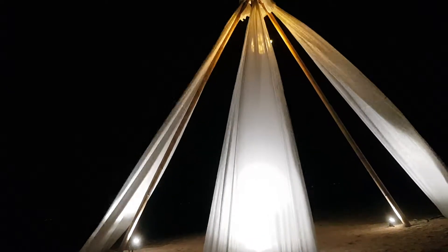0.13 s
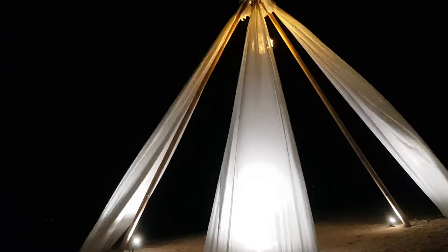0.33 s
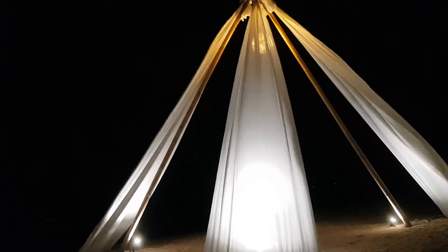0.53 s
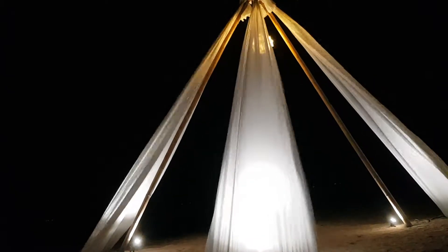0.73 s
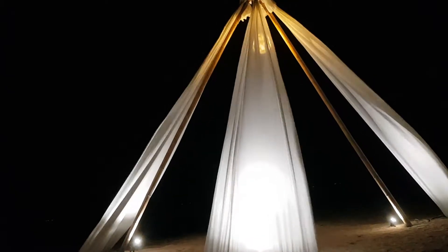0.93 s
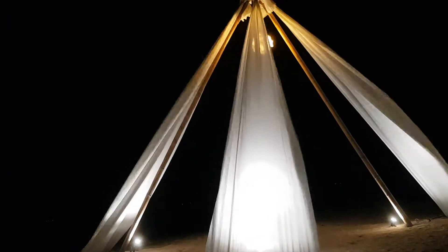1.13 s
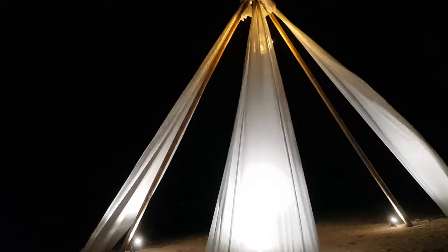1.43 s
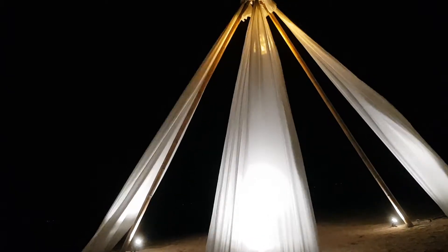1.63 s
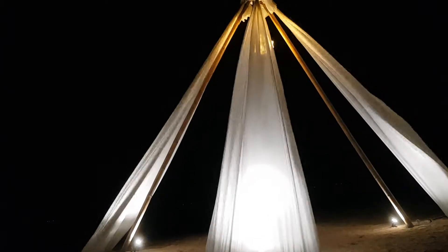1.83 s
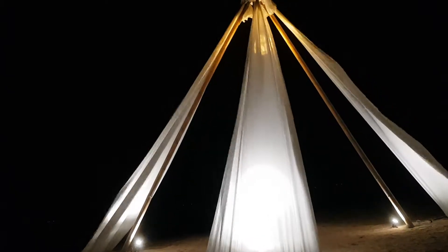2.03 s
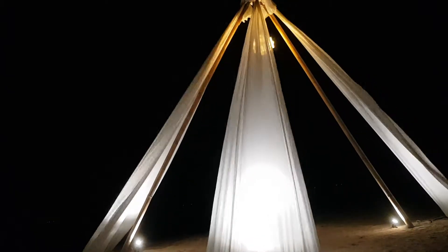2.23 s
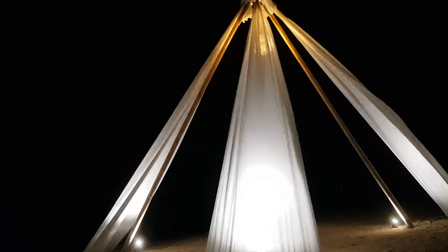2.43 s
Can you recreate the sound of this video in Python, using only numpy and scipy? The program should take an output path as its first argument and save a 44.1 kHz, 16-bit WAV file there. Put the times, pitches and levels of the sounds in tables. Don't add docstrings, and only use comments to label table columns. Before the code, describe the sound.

Low wind rumble thumps unevenly over a soft hiss of receding wave water and high insect chirring

```python
import sys
import numpy as np
from scipy import signal
from scipy.fft import rfft, irfft, next_fast_len
from scipy.io import wavfile
from scipy.ndimage import uniform_filter1d, map_coordinates

SR = 44100
rng = np.random.default_rng(int(sys.argv[2]) if len(sys.argv) > 2 else 0)


def volts(x):
    e = np.asarray(x, float) / 20
    return 10 ** e


def unload_audio(sound):
    columns = np.transpose(np.atleast_2d(sound))
    steps = np.round(np.clip(columns, -1, 1) * 32767)
    wavfile.write(sys.argv[1], SR, steps.astype(np.int16))


N = 113337


def unit(x):
    return x / np.sqrt(np.mean(x ** 2) + 1e-20)


def along(points, hz):
    f, value = np.transpose(points)
    return np.interp(np.log(hz + 1), np.log(f + 1), value)


def curve(rows):
    s, value = np.transpose(rows)
    return np.interp(np.arange(N) / SR, s, value)


def wobble(knots_per_s):
    return map_coordinates(rng.standard_normal(400), [np.arange(N) * knots_per_s / SR])


def filtered(x, response):
    m = next_fast_len(N + 8192)
    return irfft(rfft(x, m) * response(np.fft.rfftfreq(m, 1 / SR)), m)[..., :N]


def evened(x):
    power = np.abs(uniform_filter1d((x ** 2).mean(0), int(.03 * SR)))
    return unit(x / (power + .1) ** .45)


def rush(spectrum, alike, patchy_db):
    z = signal.stft(rng.standard_normal((2, N)), nperseg=512)[2]
    patches = rng.standard_normal(z.shape[1:])
    for axis in (0, 1):
        patches = uniform_filter1d(patches, size=6, axis=axis)
    pair = signal.istft(z * volts(patchy_db * unit(patches)), nperseg=512)[1][:, :N]

    def mid_side(hz):
        turn = np.arccos(np.clip(along(alike, hz), -1, 1)) / 2
        return volts(along(spectrum, hz)) * [np.cos(turn), np.sin(turn)]

    mid, side = filtered(pair, mid_side)
    return unit(np.array([mid + side, mid - side]))


# time [s], level [dB].
GUSTS = [(0, -24), (.05, -32), (.25, -26.5), (.32, -26.5), (.76, -27), (.91, -32), (.97, -44),
         (1.06, -27.5), (1.17, -31.5), (1.31, -39), (1.66, -45), (1.74, -32), (1.92, -28.5), (1.99, -27.5),
         (2.05, -48), (2.2, -27.5), (2.47, -45.5), (2.57, -32)]
# middle [s], deep push [dB], flutter [dB].
EDDIES = [(0.018, -37, -40.5), (0.057, -41, -35.9), (0.089, -33.5, -36), (0.151, -34.5, -41.3),
          (0.204, -39, -43.5), (0.245, -39, -39), (0.267, -42, -51), (0.291, -38, -40.0),
          (0.328, -31, -38.5), (0.382, -35, -41), (0.43, -38.5, -40), (0.486, -37.5, -38),
          (0.525, -38.5, -41.5), (0.571, -37, -46), (0.612, -38.5, -47), (0.645, -39.5, -44),
          (0.696, -33, -44), (0.795, -36.5, -40.3), (0.843, -32.5, -44), (0.909, -33, -54),
          (0.973, -44, -50), (1.02, -39, -44.5), (1.061, -38.5, -40.5), (1.134, -39, -39.5),
          (1.187, -39, -41), (1.235, -37, -41), (1.284, -33.5, -38), (1.32, -32.5, -37),
          (1.354, -35.5, -43.5), (1.396, -32, -41), (1.439, -32, -41), (1.473, -35.5, -41),
          (1.513, -37, -38), (1.554, -34.5, -43.5), (1.591, -38, -40.5), (1.622, -37, -43),
          (1.647, -34, -45), (1.67, -33, -44), (1.695, -43.0, -42), (1.724, -40.5, -39.5),
          (1.761, -46, -44), (1.787, -56, -45), (1.811, -45, -40), (1.889, -36.5, -40.5),
          (1.934, -41, -43.5), (1.965, -48, -43.7), (2.03, -33, -40), (2.07, -34, -41.5), (2.106, -36, -43),
          (2.174, -40, -40.5), (2.208, -40.5, -48), (2.29, -37, -46), (2.311, -42, -43),
          (2.337, -37.5, -41.5), (2.364, -56, -43.5), (2.396, -37.5, -43), (2.428, -41, -36),
          (2.473, -35, -36.5), (2.522, -34, -42)]
# frequency [Hz], density [dB per Hz].
RUMBLE = [(10, -60), (25, -49), (45, -6), (72, 1), (135, -1), (200, -7), (280, -19), (500, -46)]
# frequency [Hz], density [dB per Hz].
FLUTTER = [(60, -41), (140, -8), (200, 0), (350, -5), (520, -14), (900, -24), (1500, -60)]
# frequency [Hz], left-right likeness [0-1].
WIND_ALIKE = [(35, 0.89), (90, 0.89), (250, 0.91), (450, 0.9), (800, 0.99)]


def wind():
    half_thump_s, eddy_db, stream_push_db = .034, 2.2, -1.3 - 8
    stream_flutter_db, flutter_follows = -42 - 5, .45
    left_db, port_lag_s = .3, .00015
    gust_db = curve(GUSTS)
    s, push_db, flutter_db = np.transpose(EDDIES)
    u = (np.arange(N) / SR - s[:, None]) / half_thump_s
    thump = np.cos(np.pi / 2 * np.clip(u, -1, 1)) ** 4
    push = np.sqrt(volts(2 * (push_db + eddy_db)) @ thump + volts(2 * (gust_db + stream_push_db)))
    stream_db = stream_flutter_db + flutter_follows * (gust_db - gust_db.mean())
    flutter = np.sqrt(volts(2 * flutter_db) @ thump + volts(2 * stream_db))
    both = push * evened(rush(RUMBLE + [(1000, -120)], WIND_ALIKE, patchy_db=1.0))
    both = both + flutter * evened(rush(FLUTTER + [(3000, -120)], WIND_ALIKE, patchy_db=.5))
    balance = volts([[left_db], [-left_db]])
    return filtered(both, lambda hz: balance * np.exp(1j * np.pi * port_lag_s * hz * [[1], [-1]]))


# time [s], level [dB].
WASH = [(0, -46), (.5, -47), (.75, -47.5), (.775, -49), (.8, -47.5), (.94, -47.5), (.96, -51.5),
        (1.02, -50.7), (1.045, -48), (1.3, -48.5), (1.58, -49.5), (1.61, -51.5), (1.9, -50.5),
        (2.23, -50.5), (2.27, -52), (2.31, -50.5), (2.5, -50.5), (2.57, -53)]
# frequency [Hz], density [dB per Hz].
WATER = [(290, -5.5), (500, -5.5), (1100, -5), (1310, -7), (1680, -6), (3000, -11.5), (4650, -14.5),
         (5200, -20), (7500, -21.5)]
# frequency [Hz], left-right likeness [0-1].
WATER_ALIKE = [(400, 0.47), (900, 0.29), (1200, 0.28), (1700, 0.21), (2400, 0.037), (3350, 0.29),
               (4000, 0.053), (8000, 0.13)]
# frequency [Hz], lead of the left port [rad].
WATER_LEAD = [(900, .4), (1350, 2.3), (2100, 1.9), (3300, 2.4), (8000, 2.4)]
# frequency [Hz], density [dB per Hz].
SPRAY = [(5000, -10), (7000, -2), (8000, 0), (10000, 0), (11500, -4.5), (13000, -5.5), (15800, -12.5),
         (18000, -27)]


def surf():
    wash_gain_db, spray_gain_db, spray_follows, ebb_s = 4.5, -4.5, .98, .06
    wash_db = curve(WASH)
    body_db = wash_db + wash_gain_db + .7 * wobble(50) + .5 * wobble(24)
    body = volts(body_db) * rush(WATER + [(15000, -120)], WATER_ALIKE, patchy_db=.9)
    body = filtered(body, lambda hz: np.exp(.5j * along(WATER_LEAD, hz) * [[1], [-1]]))
    ebb_db = uniform_filter1d(wash_db, int(ebb_s * SR)) - wash_db.mean()
    spray_db = wash_db.mean() + spray_follows * ebb_db + spray_gain_db
    return body + volts(spray_db) * rush(SPRAY, [(8000, 0.076)], patchy_db=.7)


def rasp(wing):
    teeth_per_s, jitter_teeth = 338, .3
    scattered, same_path = .6, .16
    count = int(N / SR * teeth_per_s)
    at = (np.arange(count) + jitter_teeth * rng.standard_normal((2, count))) * SR / teeth_per_s
    teeth = np.array([np.bincount(np.clip(a, 0, N - 1).astype(int), minlength=N) for a in at])
    drive = np.sqrt(1 - scattered) * unit(teeth) + np.sqrt(scattered) * rng.standard_normal((2, N))
    drive[1] += same_path * drive[0]

    def resonated(center, width):
        return filtered(drive, lambda f: (1j * f * width / (center ** 2 - f * f + 1j * f * width)) ** 3)

    return [evened(resonated(center, width)) for center, width in wing]


def cricket(strokes, half_stroke_s, wing, left_db):
    s, db = np.transpose(strokes)
    u = (np.arange(N) / SR - s[:, None]) / half_stroke_s
    swell = volts(db)[:, None] * np.cos(np.pi / 2 * np.clip(u, -1, 1)) ** 2
    late = np.clip(.5 + u, 0, 1)
    early_tone, late_tone = rasp(wing)
    song = early_tone * (swell * np.sqrt(1 - late)).sum(0)
    song = song + late_tone * (swell * np.sqrt(late)).sum(0)
    return song * volts([[left_db], [-left_db]])


# middle [s], level [dB].
NEAR = [(.005, -55), (.19, -68), (.3, -68), (.52, -65), (.7, -65), (.81, -63), (1.04, -64), (1.11, -61),
        (1.19, -56.5), (1.277, -54), (1.362, -55.5), (1.447, -55.5), (1.53, -56), (1.6, -61), (1.64, -60.5),
        (2.43, -61), (2.51, -60)]
# center [Hz], width [Hz].
NEAR_WING = [
    (10200, 950),
    (10400, 900),
]


def near_cricket():
    return cricket(NEAR, .042, NEAR_WING, left_db=-4.0)


# middle [s], level [dB].
SECOND = [(.06, -68), (.19, -66), (.3, -61), (.38, -59), (.48, -57), (.56, -55.5), (.63, -58), (.715, -59),
          (.81, -59), (.89, -59), (1.11, -63), (1.23, -63), (1.34, -65), (1.48, -58), (1.88, -59),
          (1.96, -65), (2.04, -58), (2.12, -56.5), (2.2, -61), (2.29, -58), (2.38, -61), (2.46, -61),
          (2.54, -58)]
# center [Hz], width [Hz].
SECOND_WING = [
    (9150, 950),
    (9450, 850),
]


def second_cricket():
    return cricket(SECOND, .055, SECOND_WING, left_db=2.5)


# time [s], level [dB].
CHORUS = [(0, -67), (.2, -57), (.28, -68), (.34, -59), (.52, -58), (.78, -61.5), (.9, -60), (.95, -68),
          (1.02, -66), (1.06, -60), (1.45, -62), (1.55, -64), (1.7, -63), (1.95, -64), (2.08, -61.5),
          (2.3, -60.5), (2.4, -61), (2.57, -56)]
# center [Hz], width [Hz].
CHORUS_WING = [
    (7600, 840),
    (8200, 550),
]


def chorus():
    gain_db, sway_db = -2.5, 1.2
    low, high = rasp(CHORUS_WING)
    low_sway, high_sway = volts(sway_db * np.array([wobble(16), wobble(19)]))
    return volts(curve(CHORUS) + gain_db) * (low * low_sway + high * high_sway)


def scene():
    left_db = .38
    airborne = surf() + near_cricket() + second_cricket() + chorus()
    return wind() + airborne * volts([[left_db], [-left_db]])


# start [s], length [s], depth [dB].
SHUTS = [(.03, .04, -6), (.11, .02, -6), (.18, .05, -8), (.755, .04, -12), (.935, .08, -16), (1.09, .1, -9),
         (1.69, .025, -8), (2.14, .09, -11), (2.23, .06, -26), (2.29, .15, -12), (2.495, .1, -28)]


def wind_filter(dry):
    shut_hz, edge_s = 210, .015
    t = np.arange(N) / SR
    shut_db = np.zeros(N)
    for start, length, depth_db in SHUTS:
        inside_s = np.minimum(t - start, start + length - t)
        shut_db += depth_db * np.clip(inside_s / edge_s + .5, 0, 1)
    bass = filtered(dry[0], lambda hz: 1 / (1 + (hz / shut_hz) ** 6))
    return np.array([dry[0] - bass * (1 - volts(shut_db)), dry[1]])


def band_limit(x):
    return signal.sosfilt(signal.butter(12, 15910, fs=SR, output="sos"), x)


def record(dry):
    band_hz, top = 15740, .14
    both = filtered(wind_filter(dry), lambda hz: hz < band_hz)
    limited = both / (1 + np.abs(both / top) ** 4) ** 0.35
    return band_limit(limited)


dry = scene()
out = record(dry)
unload_audio(out)
```